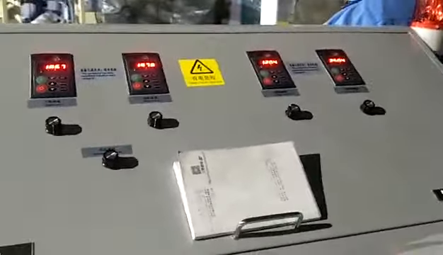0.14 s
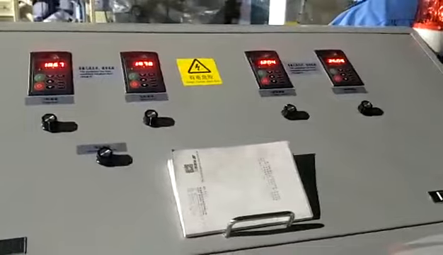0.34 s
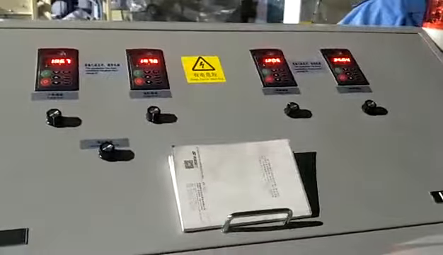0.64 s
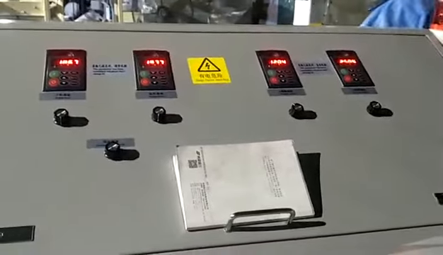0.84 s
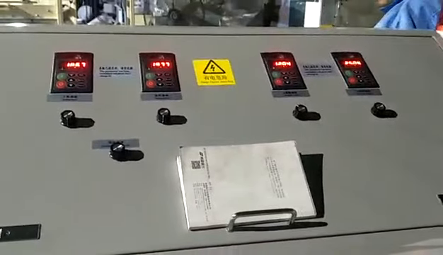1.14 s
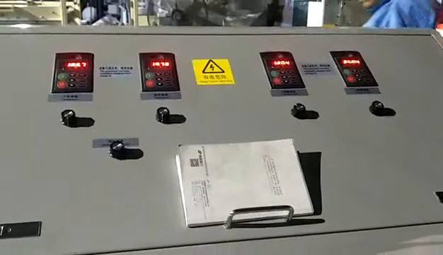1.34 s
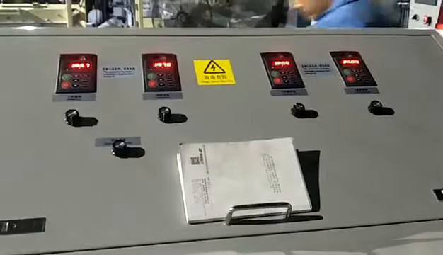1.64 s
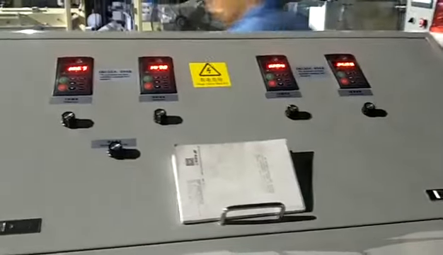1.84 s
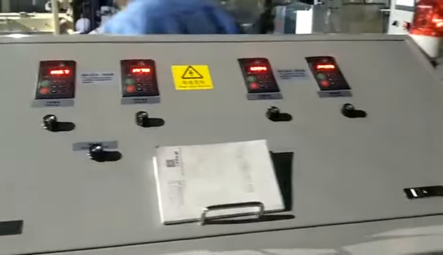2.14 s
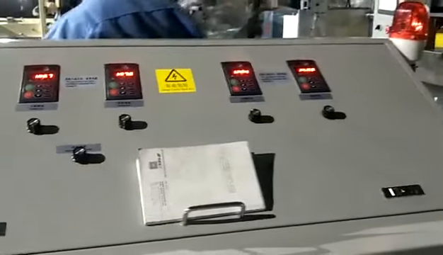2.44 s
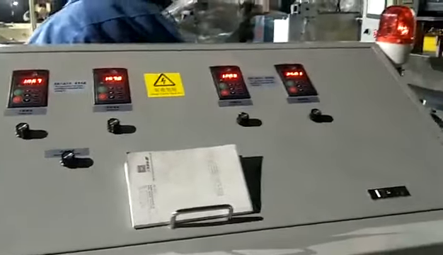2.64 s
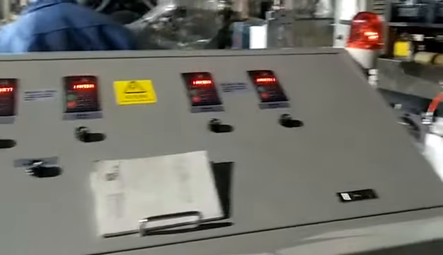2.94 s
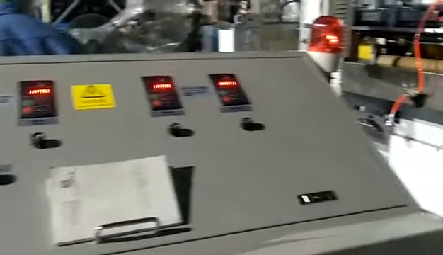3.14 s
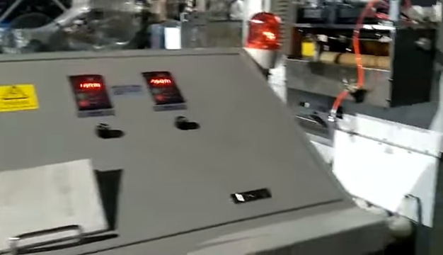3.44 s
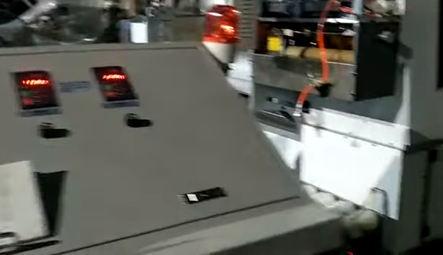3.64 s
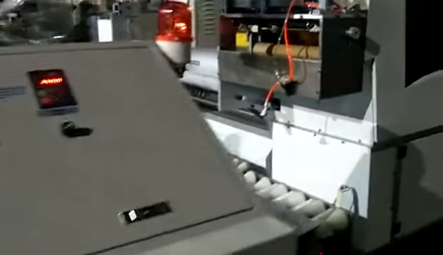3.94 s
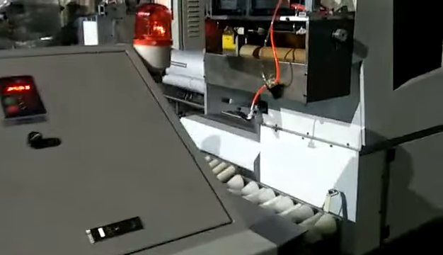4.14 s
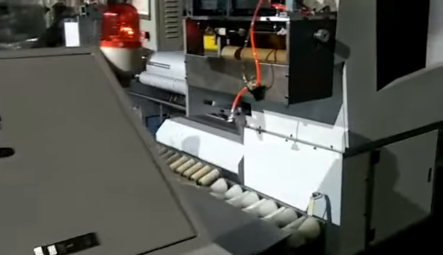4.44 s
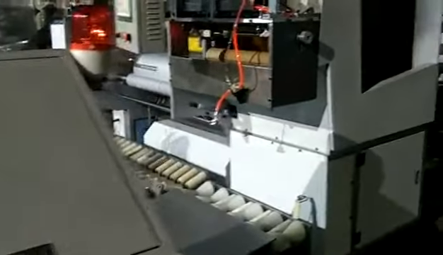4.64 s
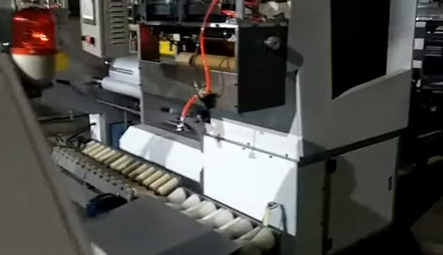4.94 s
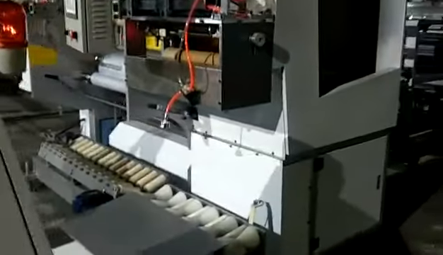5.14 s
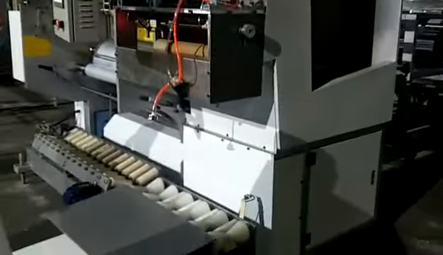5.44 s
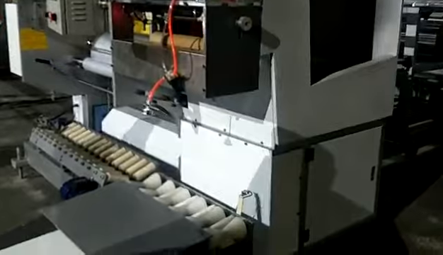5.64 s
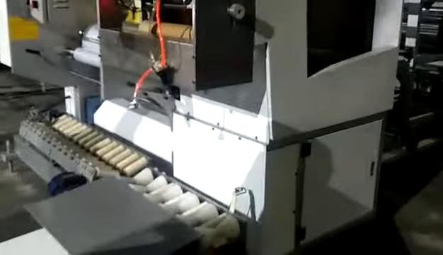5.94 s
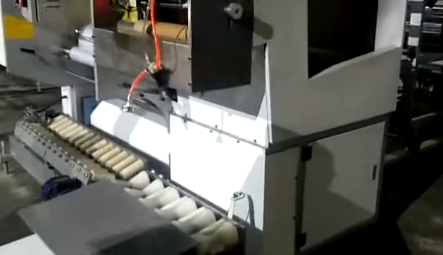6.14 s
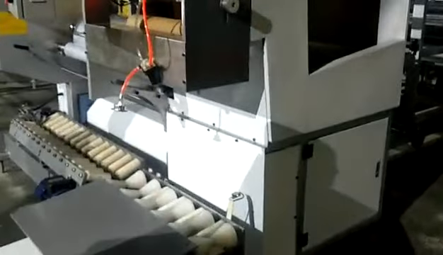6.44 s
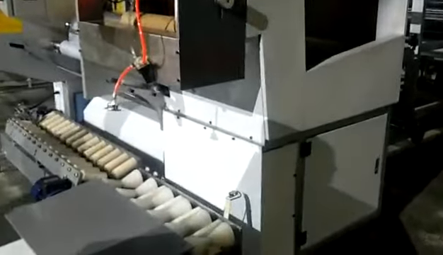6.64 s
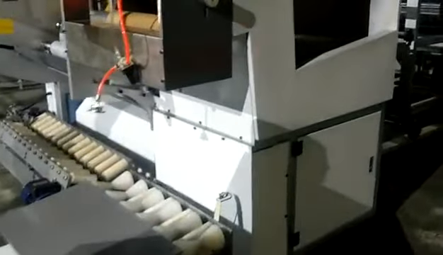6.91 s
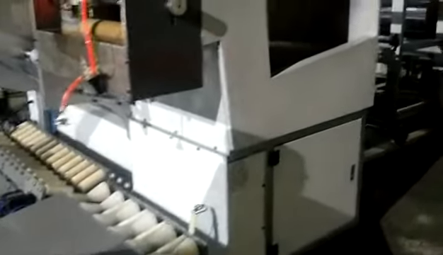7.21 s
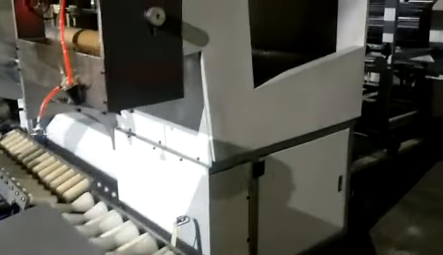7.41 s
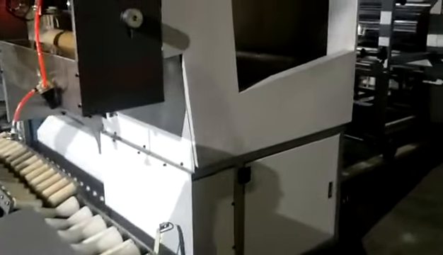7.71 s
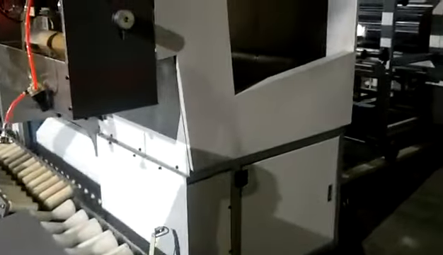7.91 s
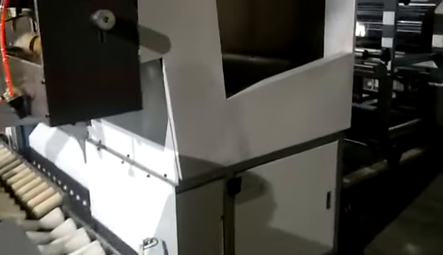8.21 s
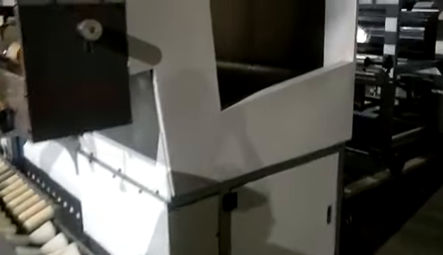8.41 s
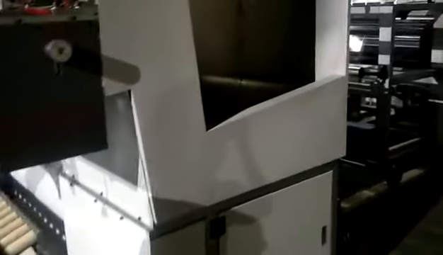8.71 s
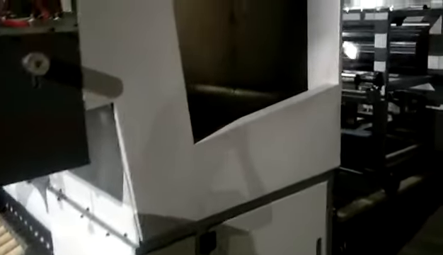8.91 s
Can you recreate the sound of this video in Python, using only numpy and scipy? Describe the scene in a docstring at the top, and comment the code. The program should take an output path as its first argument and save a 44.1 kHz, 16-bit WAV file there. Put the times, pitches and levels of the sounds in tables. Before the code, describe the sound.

A plastic film line runs continuously in a reverberant factory hall. Piercing inverter whines near 3 kHz swell and fade separately in each ear, mostly right, over a broad rush of blowers and rollers. A gearbox growl flutters in short surges, shafts hum low, and a few tiny metal ticks pass. The handheld stereo microphone turns slowly; air buffets its left side at the very end.

```python
"""A whine leaning to the right ear opens over a rush of blowers; a gearbox growl soon surges up, and shafts hum.
This is a plastic film line in a factory hall: inverter-fed motors sound as combs of tones, gears as beating
tones in a ringing housing, shafts as multiples of their speed, blowers and rollers as coloured noise.
A hand-held stereo recorder, its left port half covered, turns slowly through the hall's standing waves, so
tone groups swell and fade on their own in each ear; air buffets the left port last."""
import sys
import numpy as np
from scipy import signal
from scipy.fft import rfft, irfft, next_fast_len
from scipy.io import wavfile
from scipy.ndimage import uniform_filter1d, map_coordinates

SR = 44100
rng = np.random.default_rng(int(sys.argv[2]) if len(sys.argv) > 2 else 0)


def decibels_to_gain(level_db):
    """Convert a level in decibels to a linear amplitude gain (20 dB per decade)."""
    exponent = np.asarray(level_db, float) / 20
    return 10 ** exponent


def bounce(signal):
    """Save signal as a 16-bit WAV file at the path given by the first command-line argument."""
    frames = np.transpose(np.atleast_2d(signal))
    limited = np.clip(frames, -1, 1)
    pcm = np.round(limited * 32767).astype(np.int16)
    wavfile.write(sys.argv[1], SR, pcm)


N = 399987  # samples, about 9.07 s


def unit(x):
    """Rms 1 along time."""
    return x / np.sqrt(np.mean(x ** 2, axis=-1, keepdims=True) + 1e-20)


def along(points, hz):
    """Columns of (frequency [Hz], value, ..) points, read on a log frequency axis."""
    f, *cols = np.transpose(points)
    return np.array([np.interp(np.log(hz + 1), np.log(f + 1), c) for c in cols])


def curves(rows, t):
    """Columns after the time column, read at times t."""
    s, *cols = np.transpose(rows)
    return np.array([np.interp(t, s, c) for c in cols])


def wobble(rate, count):
    """Smooth random curves with rate knots a second, held for 64 samples at a time."""
    knots = rng.standard_normal((count, 400))
    at = np.arange(0, N + 64, 64) * np.clip(rate, .1, 40) / SR
    coarse = [map_coordinates(k, [at]) for k in knots]
    return np.repeat(coarse, 64, axis=1)[:, :N]


def coloured(x, gain):
    """Filters x by a gain that is a function of frequency."""
    m = next_fast_len(N + 8192)
    spectrum = rfft(x, m) * gain(np.fft.rfftfreq(m, 1 / SR))
    return irfft(spectrum, m)[..., :N]


def tones(comb, fade_db, drift, rate, apart=1.0, favoured_hz=None):
    """Steady tones; reflections give each its own slow fade and phase drift, partly different in each ear."""
    t, out = np.arange(N) / SR, np.zeros((2, N))
    for hz, *db in comb:
        both, left, right, fade_l, fade_r = wobble(rate, count=5)
        wander = drift * (both + apart * np.array([left, right]))  # radians
        phase = 2 * np.pi * (hz * t + rng.random()) + wander
        level = np.reshape(db, (-1, 1)) + fade_db * np.array([fade_l, fade_r])
        if favoured_hz is not None:
            level = level - ((hz - favoured_hz) / 20) ** 2  # 1 dB down at 20 Hz away
        out += np.sqrt(2) * decibels_to_gain(level) * np.sin(phase)
    return out


def hump(hz, width_hz):
    """Two ears of noise ringing in one resonance."""
    noise = rng.standard_normal((2, N))
    return unit(coloured(noise, lambda f: 1 / (1 + ((f - hz) / width_hz) ** 2) ** 1.89))


def bell(x, width, order=4):
    """A bell at half height where |x| is half the width; flat-topped for orders over two."""
    return .5 ** (np.abs(2 * x / np.maximum(width, .02)) ** order)


def swelling(rows, rest_db, order=4, rise=.5):
    """Gain at both ports: a resting level plus every swell; rise is the share of a swell spent rising."""
    s, length, *db = np.transpose(rows)
    t = np.arange(0, N + 64, 64) / SR
    late = t - (s + (rise - .5) * length)[:, None]
    late = .5 * late / np.where(late < 0, rise, 1 - rise)  # uneven sides
    gain = decibels_to_gain(rest_db)[:, None] + decibels_to_gain(db) @ bell(late, length[:, None], order)
    return np.array([np.interp(np.arange(N) / SR, t, g) for g in gain])


# tone colour of the rush below and above 2 kHz: (frequency [Hz], left [dB per Hz], right [dB per Hz])
RUSH_LOW = [(25, -94, -84), (59.6, -75, -58), (117, -62.5, -57), (250, -72.5, -65), (428, -72.5, -65),
            (616, -73, -69), (740, -75, -69), (1030, -77.5, -73), (1390, -83.5, -73), (1360, -84, -75),
            (1740, -86, -85.5)]
RUSH_HIGH = [(2304, -86.5, -84.5), (2900, -78.5, -73), (2950, -90, -76), (3664, -71.5, -68.5),
             (3760, -100, -74), (4150, -96, -80), (4360, -80.5, -76), (4900, -83, -83.5),
             (5460, -90, -81.5), (5710, -86.5, -82.5), (6230, -99, -72.5), (6700, -99, -75.5),
             (7260, -103, -75), (9060, -105, -80), (9820, -100, -86), (10500, -99, -86),
             (13700, -102, -91.5), (14900, -107, -86.5), (15900, -109, -89)]
# how alike the two ears are: (frequency [Hz], left-right likeness [0-1])
EAR_LIKENESS = [(60, 0.86), (200, 0.91), (400, 0.88), (700, 0.59), (1300, 0.017)]
# how deep the patches are: (frequency [Hz], depth before scaling and limiting [dB])
PATCH_DEPTH = [(60, 6), (200, 8), (500, 8.5), (1300, 8.5), (2000, 3.5), (3600, 3.5), (4500, 7.5),
               (6000, 7.5), (8000, 1.5), (11000, 3), (15000, 10)]
# steady layer under the patches: (frequency [Hz], amplitude beside an average patch's 1 [ratio])
STEADY_BED = [(200, .45), (600, .6), (1200, .9), (3600, .5), (4200, .08), (5500, .06), (8000, 0.19),
              (13000, .08)]
# recorder's heading, rising towards the line: (time [s], heading [quarter turns])
HEADING = [(0, -0.84), (1.5, -0.44), (3, -0.61), (4, -0.45), (5, -0.042), (6.5, 0.28), (8, 0.37),
           (9.07, 0.98)]
# what turning does to the rush: (frequency [Hz], left [dB per quarter turn], right [dB per quarter turn])
TURN_COLOUR = [(93, 1, -0.5), (189, 14, 4.5), (300, 12.5, 12.5), (500, 6.7, -0.5), (1200, 3, -3),
               (2050, 0.1, 1.5), (4700, 4.9, 5.5), (6640, 22, 2.5), (13300, 1.9, -1)]
# local swells and dips: (middle [s], length [s], frequency [Hz], left [dB], right [dB])
RUSH_WAVERS = [(0.68, 0.71, 470, 7, 5.5), (2.37, 0.53, 186, -11, -7), (2.58, 1.45, 412, 10, 7.5),
               (3.47, 1.27, 174, 11, 6), (3.82, 1.6, 1260, 0.5, -3.5), (4.47, 0.37, 400, -9, -5.5),
               (5.02, 1.32, 189, -32, -9.5), (5.5, 0.83, 294, 2.5, 9), (6.497, 0.38, 118, -12, -16),
               (6.87, 1.1, 164, 0, 4.5), (7.97, 0.83, 93, -12, -7.5), (4.6, 3.1, 11800, 4, -4.5),
               (0.34, 0.3, 1180, 10, 0.5), (7.05, 0.14, 4700, 11.5, 2.5), (7.55, 2, 1030, 4, 4),
               (1.6, 0.56, 96, 1, 4.5), (7.45, 1.6, 15600, 2, -4), (3.39, 0.089, 425, 9, 8),
               (4.0, 0.077, 400, 11, 8), (4.6, 0.72, 270, 1, 9), (8.36, 0.43, 350, -6, -5.5),
               (1.02, 0.32, 2900, 2, -10)]
# narrow gaps where reflections cancel, negative depths being peaks: (frequency [Hz], width [Hz], depth [dB])
REFLECTION_GAPS = [(3820, 90, 7.5), (4190, 70, -7), (4215, 65, 16), (4554, 72, 6.5), (4800, 51, 11),
                   (5070, 72, 7), (5680, 79, 9), (6080, 59, -3), (6800, 170, 8), (7240, 120, 4),
                   (8360, 140, 1.5), (9320, 240, 3), (10150, 240, 1.5)]


def rush():
    """Blowers and rollers: a smooth bed, broken into random patches as by noise suppression.

    Near mono in the bass, unrelated between the ears in the treble."""
    hz, t, z = signal.stft(rng.standard_normal((2, N)), SR, nperseg=1024)
    spread = np.arccos(np.clip(along(EAR_LIKENESS, hz)[0], 0, 1))[:, None] / 2
    mid, side = np.cos(spread) * z[0], np.sin(spread) * z[1]

    # one random field shared by both ears and a weaker one for each
    fields = rng.standard_normal((3,) + mid.shape)
    fields = uniform_filter1d(uniform_filter1d(fields, size=3, axis=1), size=4, axis=2)
    uneven = fields[0] + .5 * fields[1:]
    limited = 2.16 * np.tanh(uneven / uneven.std() / 1.64)
    patches = along(STEADY_BED, hz)[0][:, None] + decibels_to_gain(along(PATCH_DEPTH, hz)[0][:, None] * limited)
    patches /= np.sqrt(np.mean(patches ** 2, axis=2, keepdims=True))

    moving_db = along(TURN_COLOUR, hz)[:, :, None] * curves(HEADING, t)
    for s, length, centre_hz, *db in RUSH_WAVERS:
        octaves = np.log2((hz + 1) / centre_hz)
        reach = np.outer(bell(octaves, width=0.89), bell(t - s, length))
        moving_db = moving_db + np.multiply.outer(db, reach)

    silent_top = [(15790, -150, -150)]  # nothing audible above
    colour_db = along(RUSH_LOW + RUSH_HIGH + silent_top, hz)[:, :, None]
    gaps_db = sum(depth_db * bell(hz - centre_hz, width_hz, order=2)
                  for centre_hz, width_hz, depth_db in REFLECTION_GAPS)
    colour_db = colour_db - gaps_db[:, None]

    ears = np.array([mid + side, mid - side])
    pair = ears * patches * decibels_to_gain(colour_db + moving_db) * np.sqrt(SR / 2)  # per Hz to full band
    return signal.istft(pair, SR, nperseg=1024)[1][:, :N]


# hum of the main shaft: (multiple of shaft speed, left [dB], right [dB])
SHAFT_ORDERS = [(4, -61.5, -51.5), (5, -66, -59), (6, -61, -55.5), (7, -65, -69), (10, -67, -58.5),
                (12, -71, -77), (14, -72, -57.5), (16, -65, -62.5), (18, -75, -76), (20, -86, -55)]


def shafts():
    """Multiples of the main shaft's turning speed, coming and going."""
    shaft_hz = 29.46
    comb = [(k * shaft_hz, left, right) for k, left, right in SHAFT_ORDERS]
    return tones(comb, fade_db=5, drift=2.5, rate=14, apart=0.41)


# fan tones: (frequency [Hz], relative level [dB])
FAN_TONES = [(1555, 0), (1498, -8), (1479, -12)]
# swells of the fan: (middle [s], length [s], left [dB], right [dB])
FAN_SURGES = [(0.99, 1.57, -78, -46), (2.05, 0.31, -79, -46), (2.51, 0.33, -80, -46),
              (4.88, 0.75, -77, -48.5), (6.23, 0.86, -74, -43.5), (7.23, 0.57, -76, -49.5),
              (8.53, 0.16, -80, -44.5), (8.8, 1.5, -73, -42)]
# fan between swells: (left [dB], right [dB])
FAN_BETWEEN = (-74, -57)


def fan():
    """A far fan: three tones inside a whoosh of resonant noise."""
    whoosh = 1.3 * hump(1545, width_hz=55)
    sound = unit(tones(FAN_TONES, fade_db=3, drift=0.6, rate=9)) + whoosh
    return swelling(FAN_SURGES, FAN_BETWEEN) * unit(sound)


# comb of the small inverter: (frequency [Hz], relative level [dB])
SMALL_COMB = [(3941, -6), (3964, -4), (3989, 0), (4013, -5), (4061, -2)]
# swells of the small inverter: (middle [s], length [s], left [dB], right [dB])
SMALL_SURGES = [(0.35, 0.3, -66, -56), (1.65, 0.69, -39.5, -77), (2.19, 0.16, -44.5, -77),
                (3.7, 1.23, -54.5, -68), (5.39, 0.29, -64, -58), (6.2, 0.31, -57, -47),
                (7.05, 0.32, -62, -50), (8.2, 0.4, -62, -51), (8.71, 0.25, -73, -52), (9.07, 0.2, -70, -55)]
# small inverter between swells: (left [dB], right [dB])
SMALL_BETWEEN = (-104, -67)


def small_inverter():
    """A smaller far inverter: a flickering comb of tones near 4 kHz on a skirt of noise."""
    skirt = .5 * hump(4000, width_hz=70)
    sound = unit(tones(SMALL_COMB, fade_db=2, drift=1.2, rate=6)) + skirt
    return swelling(SMALL_SURGES, SMALL_BETWEEN) * unit(sound)


# small metal ticks: (start [s], level of each partial before panning [dB])
METAL_TICKS = [(1.66, -41), (4.7117, -44), (6.0703, -44)]


def ticks():
    """Short rings of sheet metal: three slightly detuned, dying partials, mostly to the right."""
    out, t = np.zeros(N + SR), np.arange(SR // 10) / SR
    for s, db in METAL_TICKS:
        ring = sum(np.sin(2 * np.pi * hz * rng.normal(1, 0.02) * t) for hz in (1350, 2000, 2600))
        out[round(s * SR):][:len(t)] += decibels_to_gain(db - 60 * t / 0.066) * ring  # 60 dB down in 66 ms
    return out[:N] * decibels_to_gain([[-4], [2.5]])


# tone colour of the turbulence: (frequency [Hz], relative level [dB])
BUFFET_COLOUR = [(20, -27), (60, -4.5), (100, -3), (200, -14.5), (400, -24), (800, -59), (1500, -90)]
# gusts on the left port: (start [s], dying time [s], level before the rise and decay [dB])
PORT_GUSTS = [(8.425, 0.091, -29.5), (8.62, 0.039, -23.5), (8.862, 0.026, -31), (8.975, 0.068, -18.5),
              (9.04, 0.024, -17)]
# single puffs that rock the left port: (middle [s], frequency [Hz], envelope peak [dB])
PORT_PUFFS = [(8.877, 120, -20), (8.9935, 105, -10.5), (9.0145, 120, -8)]


def buffeting():
    """Low turbulence and single puffs of air on the left port, a trace of them on the right."""
    rise_s, puff_s = 0.0079, .006  # gust's rise; half the length of a puff
    t = np.arange(N) / SR
    level = 0
    for s, fall_s, db in PORT_GUSTS:
        since = np.maximum(t - s, 0)
        level = level + decibels_to_gain(db) * (1 - np.exp(-since / rise_s)) * np.exp(-since / fall_s)
    lumps = unit(coloured(rng.standard_normal((2, N)), lambda f: decibels_to_gain(along(BUFFET_COLOUR, f))))
    puffs = 0
    for s, hz, db in PORT_PUFFS:
        envelope = decibels_to_gain(db) * np.exp(-((t - s) / puff_s) ** 2)
        puffs = puffs + envelope * np.sin(2 * np.pi * hz * (t - s) + 1)
    return (level * lumps + puffs) * decibels_to_gain([[0], [-14]])


# gear mesh tones: (frequency [Hz], relative level [dB])
MESH_TONES = [(790, 0), (825.5, 0), (865, 0), (884, -5), (904.5, -2), (943, -4)]
# the part of the growl that the hall favours at the recorder's place: (time [s], frequency [Hz])
HALL_FAVOURS = [(0, 922), (1.4, 871), (2.5, 862), (3.9, 864), (4.6, 821), (6, 822), (6.9, 867), (7.5, 795),
                (8.6, 887)]
# surges of the growl: (middle [s], length [s], left [dB], right [dB])
GROWL_SURGES = [(0.22, 0.13, -60, -35.5), (0.52, 0.12, -55, -29.5), (0.7, 0.16, -57, -32),
                (1.0, 0.25, -54, -34.5), (1.16, 0.084, -57, -39.5), (1.36, 0.09, -42, -28),
                (1.6, 0.026, -32.5, -33), (1.85, 0.14, -40, -25), (2.2, 0.13, -37, -34.5),
                (2.39, 0.095, -41, -29), (2.75, 0.18, -39, -27.5), (2.99, 0.1, -32, -38),
                (3.05, 0.17, -42, -26.5), (3.15, 0.064, -52, -32.5), (3.3, 0.071, -31, -27),
                (3.56, 0.06, -44, -25.5), (3.7, 0.22, -61, -31.5), (3.94, 0.11, -35, -26.5),
                (4.56, 0.086, -80, -29), (5.46, 0.94, -64, -33), (5.7, 0.099, -31, -29.5),
                (6.3, 0.29, -49, -28), (6.65, 0.23, -51, -26), (6.82, 0.086, -50, -25.5),
                (6.99, 0.097, -57, -25.5), (7.22, 0.086, -65, -34.5), (8.04, 0.53, -77, -41),
                (8.57, 0.035, -60, -26), (8.64, 0.072, -62, -31), (8.82, 0.014, -32, -30),
                (8.865, 0.025, -36, -27), (8.91, 0.03, -35, -37), (9.03, 0.1, -59, -34)]
# growl between surges: (left [dB], right [dB])
GROWL_BETWEEN = (-61, -44.5)


def gearbox():
    """Mesh tones beat against each other inside a rattling housing resonance."""
    t = np.arange(N) / SR
    centre = curves(HALL_FAVOURS, t)[0] + 14 * wobble(7, count=1)[0]  # Hz
    mesh = tones(MESH_TONES, fade_db=2.5, drift=0.96, rate=5.5, apart=0.28, favoured_hz=centre)
    # crossfade between two housing resonances as the favoured pitch moves
    upper = np.clip((centre - 815) / 90, 0, 1)
    housing = np.sqrt(1 - upper) * hump(815, width_hz=72) + np.sqrt(upper) * hump(885, width_hz=40)
    rattle = decibels_to_gain(1 * wobble(12, count=2) + 2.5 * wobble(35, count=1))
    growl = unit((unit(mesh) + .8 * housing) * rattle)
    return swelling(GROWL_SURGES, GROWL_BETWEEN, order=2, rise=.3) * growl


# per group, a strong tone, then weaker tones of the comb, near or far, that swell with it:
# [(frequency [Hz], level re the strong tone [dB]), ..]
WHINE_GROUPS = [
    [(2398, 0)],
    [(2548, 0)],
    [(2776, 0), (2726, -10), (2700, -13), (2676, -13), (2626, -14), (3226, -9), (3277, -8)],
    [(2876, 0), (2826, -17)],
    [(2926, 0)],
    [(2975.7, 0)],
    [(3026, 0)],
    [(3076.5, 0)],
    [(3126, 0), (3176, -12), (3327, -21)],
    [(3455, 0), (3426, -11), (3476, -13), (3377, -21)],
    [(3604.5, 0), (3576, -11), (3554, -22)],
]
# swells of each group, in the same order: [(middle [s], length [s], left [dB], right [dB]), ..]
WHINE_SURGES = [
    [(1.35, 0.4, -73, -58), (6.7, 0.27, -64, -65), (8.34, 0.1, -79, -42), (9.07, 1.15, -52, -74)],
    [(0.44, 0.36, -48.5, -80), (1.17, 0.46, -43, -73), (0.8, .3, -52, -73), (2.78, 0.63, -81, -40.5),
     (3.37, 0.33, -38, -80), (3.76, 0.22, -64, -33), (3.93, 0.1, -55, -46), (4.11, 0.25, -53, -33),
     (4.68, 0.21, -82, -40), (4.95, 0.24, -40, -62), (6.93, 0.18, -73, -41.5), (7.29, 0.083, -80, -40),
     (7.88, 0.24, -37.5, -79), (8.19, 0.13, -80, -46), (8.5, 0.13, -59, -57), (8.9, 0.3, -51, -48)],
    [(3.24, 0.6, -77, -44), (4.12, 0.76, -80, -47.5), (4.78, 0.19, -45, -66), (6.25, 1.8, -56, -51),
     (7.49, 0.52, -45, -68), (8.54, 0.25, -73, -46.5)],
    [(1.14, 1.6, -54, -44.5), (3.73, 0.42, -73, -55), (4.86, 0.22, -62, -46), (6.02, 0.25, -66, -39),
     (6.71, 0.2, -39, -39), (7.4, 0.29, -39.5, -45), (8.17, 0.53, -59, -44)],
    [(0.0, 0.097, -66, -37), (0.33, 0.39, -44, -69), (1.12, 1.36, -60, -31), (2.35, 0.73, -39.5, -80),
     (2.78, 0.57, -72, -35.5), (3.68, 0.51, -59, -31.5), (4.75, 0.36, -67, -33.5), (5.37, 0.27, -33.5, -60),
     (5.5, 0.48, -84, -30), (6.06, 0.4, -63, -37), (6.63, 0.52, -54, -38.5), (7.04, 0.085, -38, -66),
     (7.45, 0.27, -27, -30.5), (8.13, 0.52, -60, -30), (8.67, 0.17, -33, -81), (8.8, 0.26, -59, -31.5)],
    [(0.0, 0.22, -56, -35.5), (0.47, 0.33, -59, -31.5), (1.63, 0.96, -80, -30), (2.49, 0.99, -42, -67),
     (3.61, 0.26, -80, -36.5), (4.73, 0.38, -44.5, -44), (5.46, 0.66, -53, -43), (6.71, 0.14, -34.5, -68),
     (7.44, 0.11, -58, -30.5), (7.61, 0.22, -34.5, -80), (7.99, 0.19, -91, -30.5), (8.29, 0.26, -57, -42),
     (8.73, 0.17, -53, -44)],
    [(0.49, 0.3, -59, -42), (0.9, 0.45, -73, -44), (6.23, 0.57, -63, -40), (7.31, 0.49, -52, -42),
     (8.33, 0.3, -41, -54), (9.07, 0.49, -50, -47)],
    [(0.0, 0.28, -63, -40), (0.58, 0.63, -61, -33.5), (0.94, 1.7, -66, -50), (3.99, 0.29, -44, -80),
     (4.28, 1.3, -43.5, -72), (4.66, 0.17, -39, -64), (5.2, 0.17, -55, -40), (5.65, 0.15, -80, -36.5),
     (6.02, 0.49, -37, -42), (6.28, 0.33, -68, -31), (6.88, 0.21, -39, -50), (7.34, 0.36, -53, -34),
     (7.88, 0.24, -80, -30.5), (8.35, 0.3, -41, -60), (9.07, 0.42, -34.5, -41)],
    [(0.0, 0.14, -64, -35), (0.72, 0.92, -70, -36), (1.35, 0.23, -70, -44), (4.25, 1.6, -48, -71),
     (4.84, 0.17, -39.5, -68), (5.18, 0.24, -39.5, -61), (5.95, 0.68, -61, -50), (6.35, 0.37, -66, -51),
     (6.9, 0.13, -47, -36), (7.47, 0.11, -37, -60), (8.18, 1.1, -47, -53), (9.07, 0.63, -43, -52)],
    [(0.48, 0.32, -86, -39), (1.19, 0.81, -41, -80), (1.62, 0.78, -73, -44), (2.42, 0.18, -48, -57),
     (3.07, 0.88, -75, -38), (3.16, 0.12, -47, -70), (3.97, 0.83, -50, -38), (4.54, 0.2, -42, -82),
     (5.15, 0.61, -80, -38), (5.7, 0.41, -39.5, -80), (5.83, 0.28, -78, -33), (6.59, 0.84, -80, -36.5),
     (8.22, 1.55, -57, -37.5), (8.48, 0.15, -80, -41), (8.74, 0.17, -60, -65)],
    [(0.82, 1.1, -76, -41.5), (2.77, 1.33, -85, -44), (3.11, 0.54, -60, -49), (3.82, 0.19, -69, -43.5),
     (4.77, 0.48, -54, -43.5), (5.69, 0.088, -63, -40), (6.21, 0.58, -65, -46), (6.68, 0.28, -67, -48),
     (7.41, 0.3, -75, -39.5), (8.13, 0.18, -72.5, -44), (8.34, 0.21, -46, -78), (8.54, 0.15, -68, -36),
     (8.84, 0.24, -64, -38.5)],
]
# each group between swells: (left [dB], right [dB])
WHINE_BETWEEN = [(-97, -97), (-81, -84), (-89, -89), (-68, -54), (-78, -83), (-76, -86), (-70, -54.5),
                 (-83, -76), (-82, -80), (-94, -93), (-91, -52)]


def inverters():
    """Switching at 3 kHz, split into sidebands by the motors' supply frequency; each group trails a rough skirt."""
    out = np.zeros((2, N))
    for rows, rest_db, comb in zip(WHINE_SURGES, WHINE_BETWEEN, WHINE_GROUPS):
        strong = tones(comb[:1], fade_db=.8, drift=0.35, rate=8)
        weak = tones(comb[1:], fade_db=2.5, drift=.8, rate=5)
        skirt = decibels_to_gain(-12.5) * hump(comb[0][0], width_hz=36)
        out += swelling(rows, rest_db) * (strong + weak + skirt)
    return out


# strength of the noise suppression: (frequency [Hz], twice the share of usual power taken off [ratio])
SUPPRESSION = [(60, 0), (150, .3), (1500, .3), (3400, .45), (3800, .9), (6000, .8), (8000, .7),
               (10000, 1.1), (11500, .7), (15500, .8)]


def suppressor(x):
    """Noise suppression: what sinks under its usual level for a moment is pushed further down."""
    floor_db = -20  # deepest cut
    hz, t, z = signal.stft(x, SR, nperseg=1024)
    power = uniform_filter1d(uniform_filter1d(np.abs(z) ** 2, size=3, axis=1), size=5, axis=2)
    power = np.abs(power) + 1e-20
    usual = np.exp(uniform_filter1d(uniform_filter1d(np.log(power), size=15, axis=1), size=100, axis=2))
    taken = along(SUPPRESSION, hz)[0][:, None] * .5 * usual / power
    kept = np.clip(1 - taken, decibels_to_gain(floor_db) ** 2, 1)
    return signal.istft(z * np.sqrt(kept), SR, nperseg=1024)[1][:, :N]


def scene():
    """Everything in the hall, from the background to the whine."""
    background = rush() + shafts() + fan() + small_inverter()
    return background + ticks() + buffeting() + gearbox() + inverters()


def band_limit(x):
    """A steep low-pass at the top of the band."""
    return signal.sosfilt(signal.butter(12, 16950, fs=SR, output="sos"), x)


def record(dry):
    """The recorder suppresses noise, then stores the sound."""
    finished = suppressor(dry)
    return band_limit(finished)


dry = scene()
out = record(dry)
bounce(out)
```